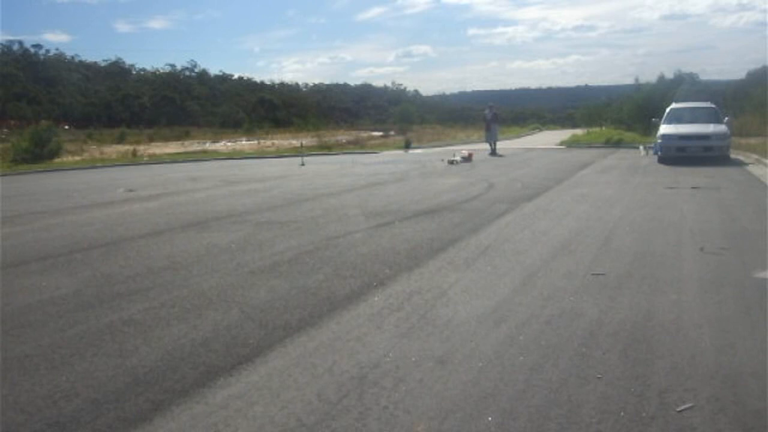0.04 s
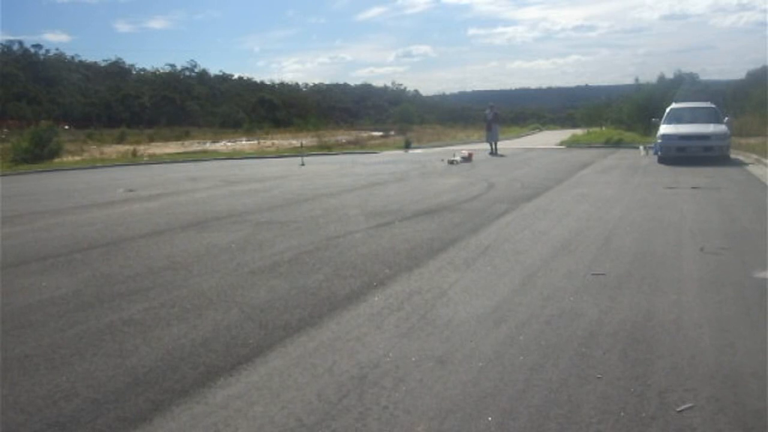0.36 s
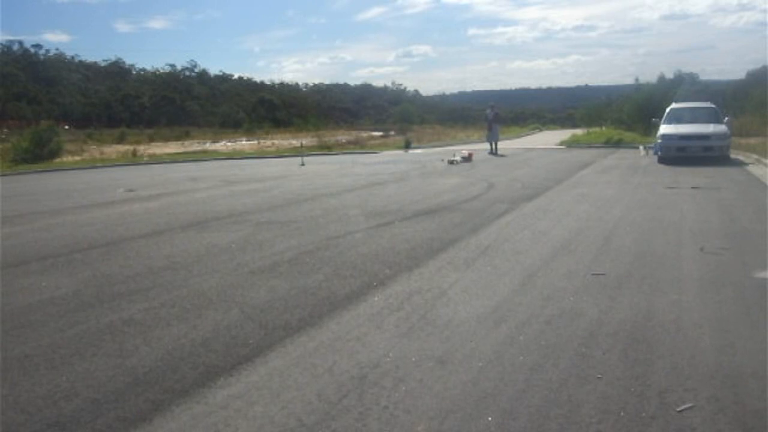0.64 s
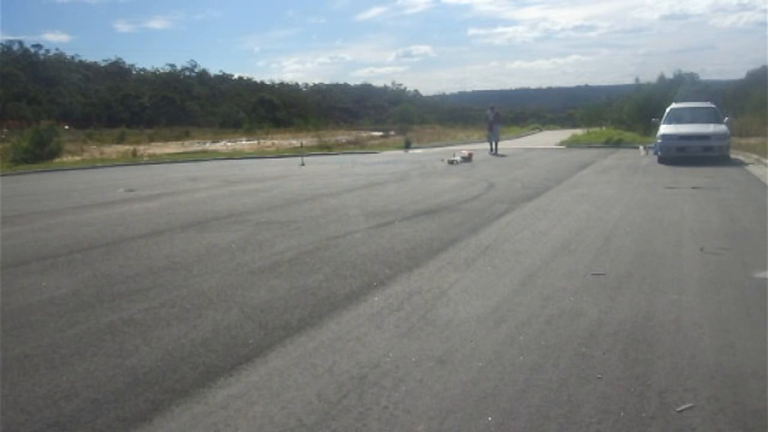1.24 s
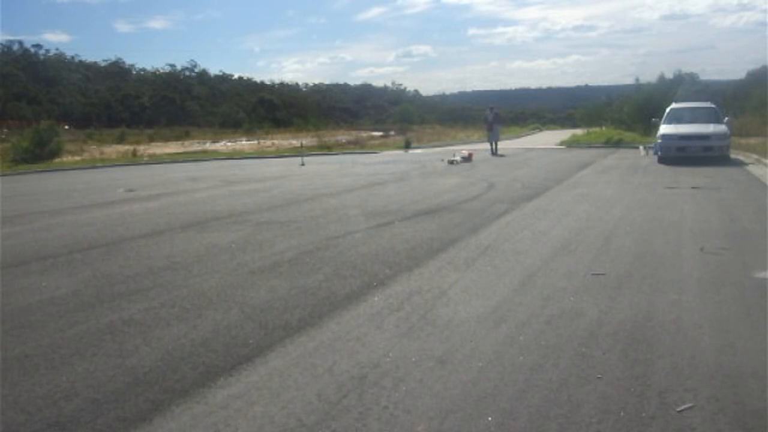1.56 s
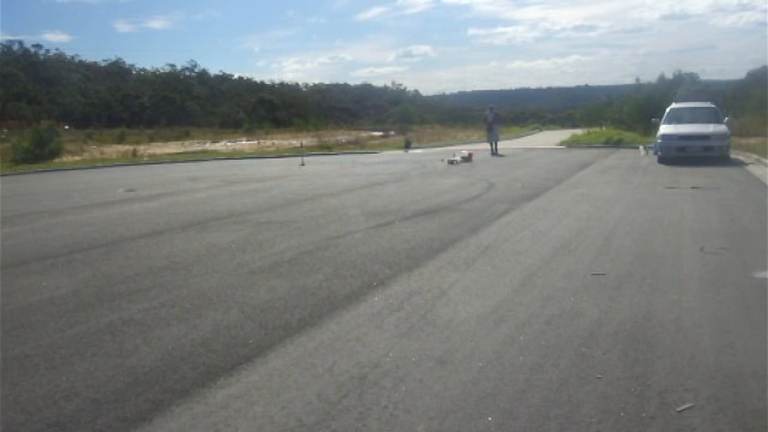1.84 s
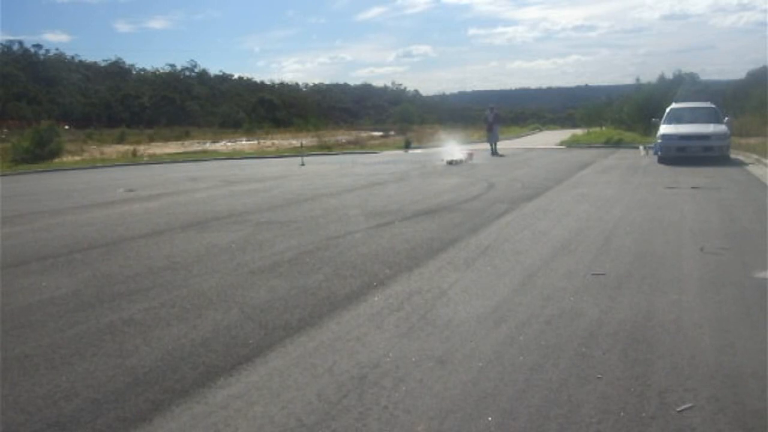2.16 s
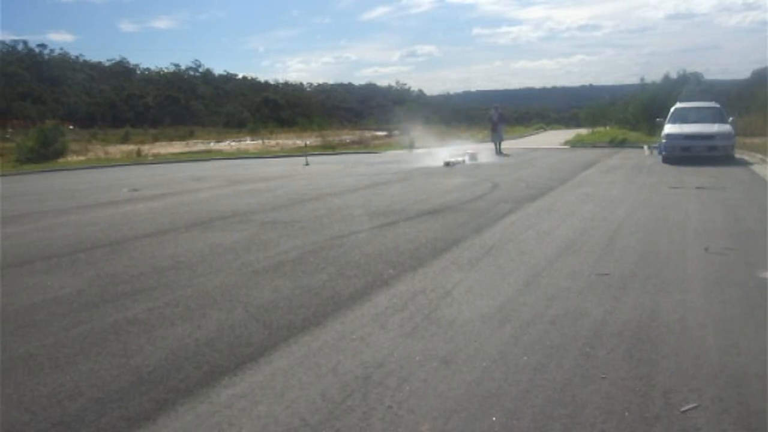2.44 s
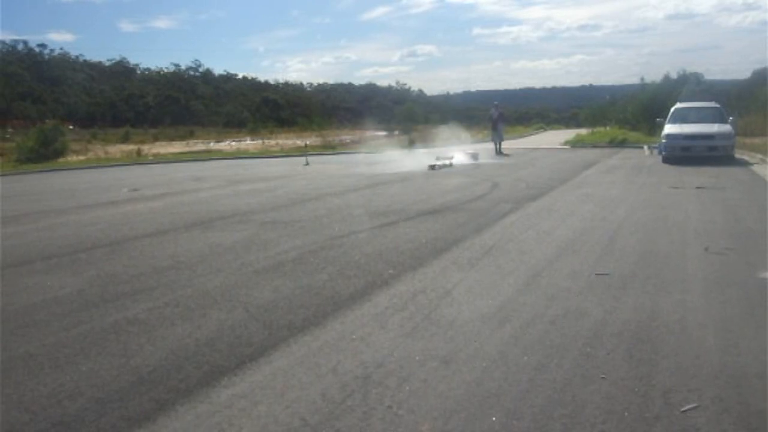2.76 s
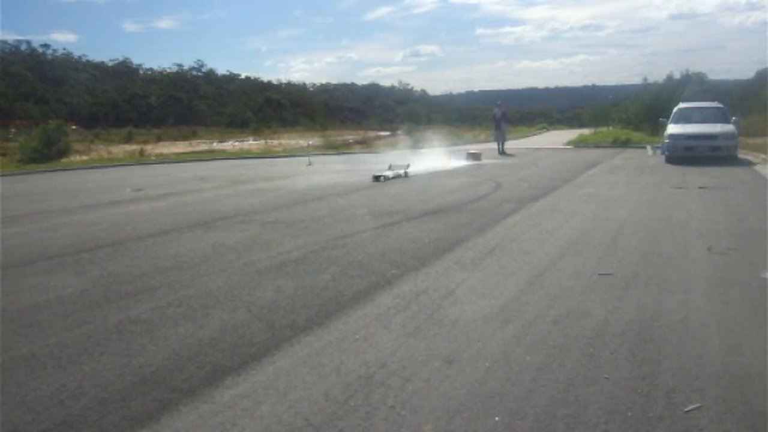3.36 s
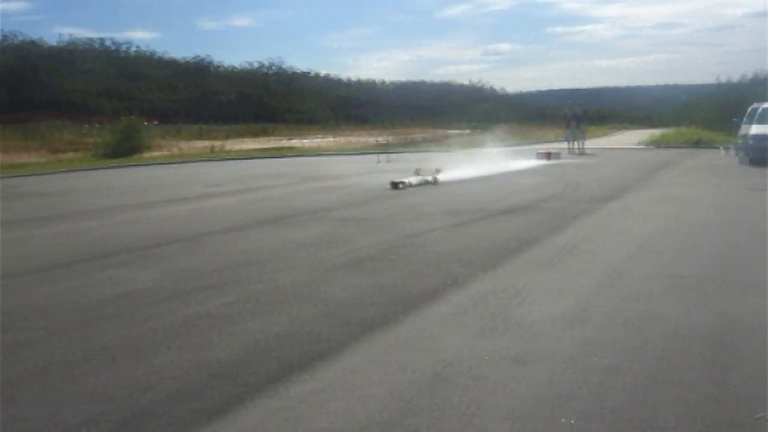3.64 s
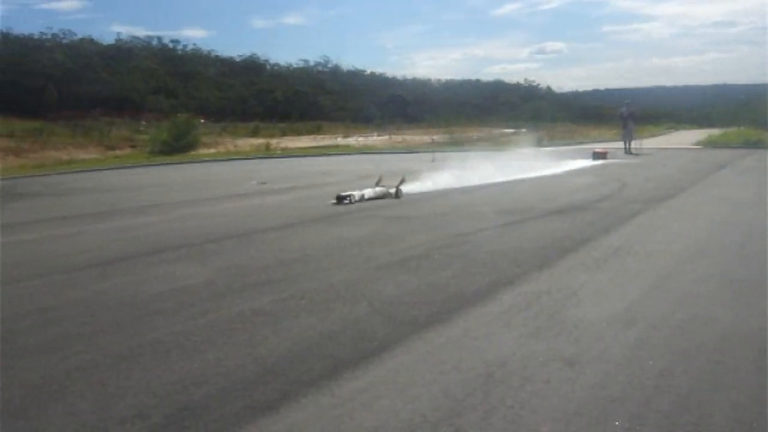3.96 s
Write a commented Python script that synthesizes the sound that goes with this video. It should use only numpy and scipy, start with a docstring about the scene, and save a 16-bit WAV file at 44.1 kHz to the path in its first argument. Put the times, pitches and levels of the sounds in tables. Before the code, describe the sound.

Loud hissing water jet from a small rocket car bursts out after quiet outdoor air.

```python
"""Quiet air over open asphalt, a few wind puffs on the microphone, a distant motor speeding up.
Then a water rocket car launches: the release clacks, the nozzle opens with a crack and a short blast.
The jet (turbulence, bursting drops, a ringing nozzle) spits, sprays, gushes, settles to a whistling
hiss, thins out and swells again as the car comes nearer."""
import sys
import numpy as np
from scipy import signal
from scipy.fft import rfft, irfft, next_fast_len
from scipy.io import wavfile
from scipy.ndimage import uniform_filter1d, map_coordinates

SR = 44100
rng = np.random.default_rng(int(sys.argv[2]) if len(sys.argv) > 2 else 0)


def unload_wav(signal):
    """Save mono or channel-first audio to the path in sys.argv[1] as 16-bit WAV at rate SR, clipped to [-1, 1]."""
    wavfile.write(
        sys.argv[1],
        SR,
        np.round(np.clip(np.atleast_2d(signal).T, -1, 1) * 32767).astype(np.int16),
    )


N = 176400

# ambient spectra (frequency [Hz], relative density [dB])
AIR_SPECTRUM = [(12, -23), (20, -3), (45, -7.5), (90, -6), (137, -12.5), (184, -14), (280, -16),
                (430, -20.5), (600, -19), (760, -16.5), (1000, -18.5), (1560, -23.5), (4600, -28),
                (7000, -33), (8450, -39), (9900, -50), (11000, -68), (14000, -105)]
BREEZE_SPECTRUM = [(10, -8), (35, 1), (80, 0), (200, -19), (500, -39), (2000, -80)]
# distant hum and faint high whine (frequency [Hz], level [dB])
HUM_TONES = [(72, -51), (177, -59.5), (354, -69), (7677, -70.5), (8323, -74)]
# distant motor (time [s], pitch [Hz], level [dB])
MOTOR_TRACK = [(.65, 85.5, -54), (.93, 89.6, -50.5), (1.26, 98.9, -46), (1.64, 101.6, -47.5),
               (2, 106, -48.5), (2.7, 112, -49), (3.05, 113, -52), (3.31, 110.9, -53.5), (3.55, 99, -57.5)]
# air pushes on the microphone (time [s], peak [dB], pitch [Hz])
PUFFS = [(0.17, -31, 150), (.191, -40, 120), (0.203, -25.5, 140), (.286, -37, 150), (.359, -38, 90),
         (.512, -33, 138), (0.535, -37, 151), (0.599, -20.5, 111), (0.618, -25, 123), (2.8856, -8.5, 524)]

# launch spectra (frequency [Hz], relative density [dB])
RELEASE_SPECTRUM = [(88, -44), (150, -12), (547, -2), (2070, -9.5), (2710, -17), (4240, -14), (7960, -17),
                    (11000, -43), (14300, -76), (22000, -120)]
BLAST_SPECTRUM = [(60, -25), (150, -4), (250, -1), (450, -8), (660, -4.5), (1600, -12), (2200, -7),
                  (2900, -10), (3400, -9), (5400, -1.5), (6800, -3), (8000, -5.5), (9000, -17),
                  (11000, -32), (14000, -60)]
# resonances of rocket body, and of nozzle with tank (frequency [Hz], width [Hz], relative gain [dB])
BODY_MODES = [(220, 50, -8), (647, 70, 0), (830, 24, 9), (1340, 26, 8), (2016, 60, 1.5), (2470, 55, -2),
              (2650, 55, 0), (3560, 81, 5.5), (4290, 62, 6), (5110, 70, 5), (5560, 50, -4), (8020, 66, -6)]
NOZZLE_MODES = [(982, 86, 1.5), (2530, 266, -2), (3545, 280, -0.5), (5280, 220, 0.5), (6650, 290, 0),
                (9280, 450, -13.5)]
# bursting air pockets (time [s], nominal peak [dB])
CRACKS = [(2.2977, -3.5), (2.3005, -6), (2.3205, -8), (3.9086, -10.5)]

# jet spectra, in stage order (frequency [Hz], relative density [dB])
SPIT = [(71, -41), (120, -10), (505, -15.5), (622, -7.5), (825, -7), (942, -14), (1250, -9), (1600, -19.5),
        (2120, -6.5), (2470, -3.5), (2870, -15.5), (3160, 2), (3410, -6.5), (3670, -4), (5160, -0.5),
        (6480, -4), (11000, -27), (14300, -58), (22000, -120)]
SPRAY = [(100, -17), (400, -9.5), (630, -0.5), (900, -8), (1100, -0.5), (1450, -10), (2000, -3.5),
         (2550, -1.5), (2900, -9), (3500, -3), (4300, -4.5), (5500, -1.5), (6700, -6.5), (7300, -10.5),
         (8200, -13), (9400, -23), (11000, -29), (14000, -70)]
GUSH = [(70, -37), (120, -9), (200, -27), (315, -5), (400, -14), (500, -3), (633, 1), (880, -6.5),
        (1060, 1), (1400, -12.5), (1650, -4.5), (1900, -11), (2090, -0.5), (2300, -6.5), (2570, 1),
        (2870, -16), (3500, -4), (4200, -9), (5300, -12), (5850, -12), (6650, -10), (7300, -21),
        (7900, -10), (8700, -31), (9400, -25), (11000, -42), (14000, -70)]
STREAM = [(70, -40), (130, -17.5), (330, -16.5), (505, -5), (825, -5.5), (980, -1.5), (1160, -10),
          (1450, -8.5), (1630, -3.5), (1800, -9), (2010, -1), (2290, -3.5), (2500, 1.5), (2830, -10),
          (3600, -4.5), (4270, -9.5), (5250, -11.5), (5650, -11.5), (6730, -2.5), (7400, -11),
          (8130, -17.5), (8800, -18.5), (9400, -17.5), (10000, -27), (11000, -53), (14000, -78)]
THIN = [(71, -61), (120, -24), (175, -25), (281, -16.5), (426, -12.5), (737, -13), (942, -9), (1570, -10),
        (1730, -5), (2210, -1.5), (2930, -5.5), (3160, -5.5), (7400, -16), (9110, -24.5), (11000, -46.5),
        (14300, -72), (22000, -120)]
BLOWOUT = [(70, -40), (130, -20.5), (300, -16), (555, -7.5), (740, -11), (860, -3.5), (1120, -9),
           (1250, -3.5), (1730, 0.5), (1930, -7.5), (2160, .5), (2650, -4), (2900, -8.5), (3150, -.5),
           (3700, -1.5), (5200, -6.5), (5900, -5.5), (6700, -13.5), (7600, -12), (8400, -15.5), (9100, -26),
           (11000, -40), (14000, -70)]
# crossfades between stages (midpoint [s], length [s])
STAGE_FADES = [(2.42, .06), (2.558, 0.11), (2.738, 0.13), (3.432, 0.18), (3.748, 0.17)]
# jet strength (time [s], relative level [dB])
JET_LEVEL = [(2.328, -27), (2.342, -25.5), (2.35, -22), (2.44, -20), (2.55, -20.5), (2.69, -20.5),
             (2.83, -21), (2.92, -22.5), (3.35, -22.5), (3.46, -24), (3.52, -26.5), (3.63, -27.5),
             (3.73, -20.5), (3.84, -18), (3.94, -19), (3.995, -22)]
# air pockets choking the jet (time [s], half length [s], depth [dB])
CHOKES = [(2.429, 0.0037, 8.5), (2.757, 0.021, 2.5)]

OPEN_AT_S, OPENING_S = 2.2977, 0.027  # nozzle opening: start, duration


def amp(db):
    """Decibels to gain."""
    return 10 ** (np.asarray(db) / 20)


def unit(x):
    """Scale to rms 1."""
    return x / np.sqrt(np.mean(x ** 2) + 1e-20)


def clock():
    """Sample times [s]."""
    return np.arange(N) / SR


def curves(rows):
    """Per-sample curve for each column after time."""
    times_s, *columns = np.transpose(rows)
    return [np.interp(clock(), times_s, column) for column in columns]


def wobble(rate_hz):
    """Smooth random curve with knots at rate_hz."""
    return map_coordinates(rng.standard_normal(int(N * rate_hz / SR) + 4), [clock() * rate_hz])


def decay(start_s, t60_s):
    """Instant onset, exponential fall."""
    age_s = clock() - start_s
    return (age_s >= 0) * amp(-60 * np.maximum(age_s, 0) / t60_s)


def tone(hz, drift_hz):
    """Drifting sine, rms 1."""
    return np.sqrt(2) * np.sin(2 * np.pi * np.cumsum(hz + drift_hz * wobble(8.23)) / SR)


def filtered(x, response):
    """Apply a frequency response."""
    size = next_fast_len(N + SR // 2)
    return irfft(rfft(x, size) * response(np.fft.rfftfreq(size, 1 / SR)), size)[:N]


def coloured(x, spectrum):
    """Shape x by a spectrum on a log frequency axis, rms 1."""
    knots_hz, db = np.transpose(spectrum)
    return unit(filtered(x, lambda hz: amp(np.interp(np.log(hz + 1), np.log(knots_hz + 1), db))))


def ringing(x, modes):
    """Parallel resonators of alternating sign, rms 1."""
    def response(hz):
        return sum((-1) ** k * amp(db) * 1j * hz * width_hz / (mode_hz**2 - hz**2 + 1j * hz * width_hz)
                   for k, (mode_hz, width_hz, db) in enumerate(modes))
    return unit(filtered(x, response))


def turbulence(patchy_db):
    """White noise with random gain patches in time and frequency, rms 1."""
    bins = signal.stft(rng.standard_normal(N), nperseg=512)[2]
    patches = uniform_filter1d(rng.standard_normal(bins.shape), 5, axis=0)
    patches = unit(uniform_filter1d(patches, 8, axis=1))
    return unit(signal.istft(bins * amp(patchy_db * patches), nperseg=512)[1][:N])


def air():
    """Quiet, slightly uneven open-air noise."""
    return amp(-47 + 0.26 * wobble(3.2)) * coloured(turbulence(patchy_db=0.47), AIR_SPECTRUM)


def hum(fade_from_s=1.47, fade_db_per_s=21.5):
    """Distant hum and faint whine; the lowest tone fades."""
    fade = amp(-fade_db_per_s * np.maximum(clock() - fade_from_s, 0))
    lowest, *rest = [amp(db) * tone(hz, drift_hz=0.38) for hz, db in HUM_TONES]
    return lowest * fade + sum(rest)


def motor(fade_s=0.2):
    """A distant motor gains speed, then slows and fades."""
    t = clock()
    pitch_hz, level_db = curves(MOTOR_TRACK)
    inside_s = np.minimum(t - MOTOR_TRACK[0][0], MOTOR_TRACK[-1][0] - t)
    gate = np.clip(1 + inside_s / fade_s, 0, 1)
    return gate * amp(level_db + 0.5 * wobble(5)) * tone(pitch_hz, drift_hz=0.32)


def breeze(middle_s=0.42, half_s=0.33, level_db=-46):
    """A passing breeze rumbles under the first puffs."""
    swell = np.exp(-((clock() - middle_s) / half_s) ** 2)
    return amp(level_db) * swell * coloured(rng.standard_normal(N), BREEZE_SPECTRUM)


def puffs(tip_share=0.17, tip_ratio=2.2):
    """Each push of air is one pressure swing with a sharper tip."""
    def swing(at_s, hz):
        u = (np.pi * hz * (clock() - at_s)) ** 2
        return (2 * u - 1) * np.exp(-u)
    return sum(amp(db) * ((1 - tip_share) * swing(at_s, hz) + tip_share * swing(at_s, hz * tip_ratio))
               for at_s, db, hz in PUFFS)


def release(at_s=2.2805, level_db=-27):
    """The launcher lets go with a dull clack."""
    return amp(level_db) * decay(at_s, t60_s=0.14) * coloured(rng.standard_normal(N), RELEASE_SPECTRUM)


def blast(level_db=-19, sag_db=1.5, body_db=0.5):
    """The nozzle comes free: a short rush rings the body and is choked by the water."""
    progress = (clock() - OPEN_AT_S) / OPENING_S
    rush = coloured(rng.standard_normal(N), BLAST_SPECTRUM)
    body = amp(body_db) * ringing(rng.standard_normal(N), BODY_MODES)
    envelope = (progress >= 0) * (progress < 1) + decay(OPEN_AT_S + OPENING_S, t60_s=0.015)
    return unit(rush + body) * envelope * amp(level_db - sag_db * np.clip(progress, 0, 1))


def cracks(crest_db=5):
    """Pockets of compressed air burst at the nozzle."""
    envelope = sum(amp(peak_db - crest_db) * decay(at_s, t60_s=0.0075) for at_s, peak_db in CRACKS)
    return envelope * coloured(rng.standard_normal(N), BLAST_SPECTRUM)


def drops(rate_hz=700, spread_db=2):
    """Bursting drops: random impulses, rms 1."""
    impulses = (rng.random(N) < rate_hz / SR) * rng.choice([-1, 1], N)
    return unit(impulses * amp(spread_db * np.minimum(rng.exponential(size=N), 3)))


def whistle(from_s=2.376, to_s=3.5, fade_s=0.12):
    """Nozzle and tank ring while water flows."""
    t = clock()
    wet = np.clip(np.minimum(t - from_s, to_s - t) / fade_s, 0, 1)
    return wet * ringing(rng.standard_normal(N), NOZZLE_MODES)


def jet(trim_db=-0.5, drops_db=-11.5, whistle_db=-7, flutter_db=0.43, sputter_db=0.96):
    """Turbulence and drops sputter from the ringing nozzle; the spectrum shifts as the tank empties."""
    t = clock()
    flow = unit(turbulence(patchy_db=1.32) + amp(drops_db) * drops())
    hiss = coloured(flow, SPIT)
    for stage, (middle_s, length_s) in zip([SPRAY, GUSH, STREAM, THIN, BLOWOUT], STAGE_FADES):
        share = np.clip((t - middle_s) / length_s + 0.5, 0, 1)
        hiss = (1 - share) * hiss + share * coloured(flow, stage)
    sound = hiss + amp(whistle_db) * whistle()
    opened = np.clip((t - OPEN_AT_S) / OPENING_S, 0, 1)
    strength_db, = curves(JET_LEVEL)
    choke_db = sum(db * np.exp(-((t - at_s) / half_s) ** 2) for at_s, half_s, db in CHOKES)
    flicker_db = flutter_db * wobble(35) + sputter_db * wobble(220)
    return opened * sound * amp(trim_db + strength_db - choke_db + flicker_db)


def scene():
    """Mono sum, no reflections."""
    background = motor() + hum() + air() + puffs() + breeze()
    return (background + release() + blast() + cracks() + jet())[None]


def record(dry):
    """Low-pass with a linear edge."""
    stop_hz, edge_hz = 11400, 500
    return filtered(dry[0], lambda hz: np.clip((stop_hz - hz) / edge_hz, 0, 1))[None]


dry = scene()
out = record(dry)
unload_wav(out)
```